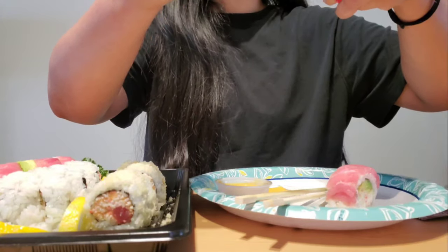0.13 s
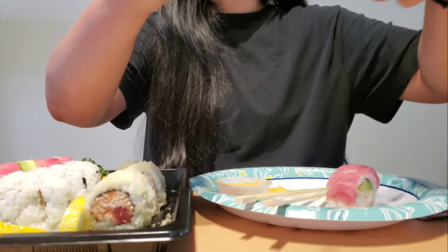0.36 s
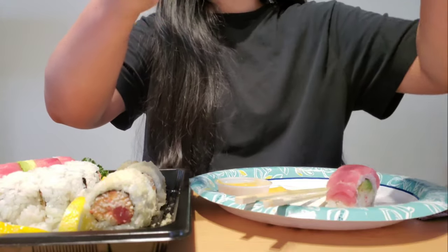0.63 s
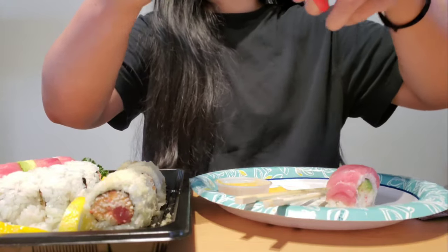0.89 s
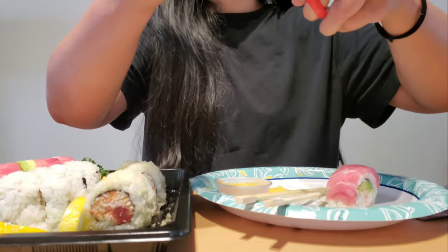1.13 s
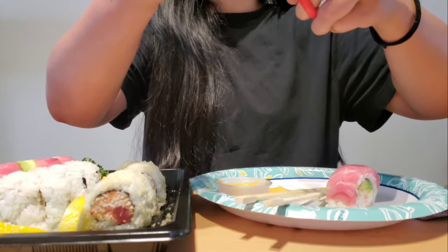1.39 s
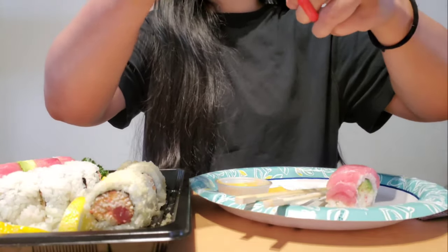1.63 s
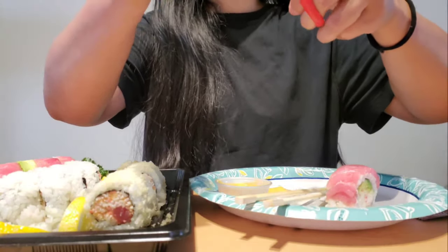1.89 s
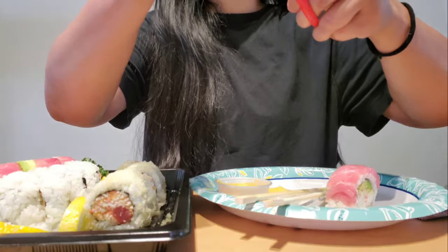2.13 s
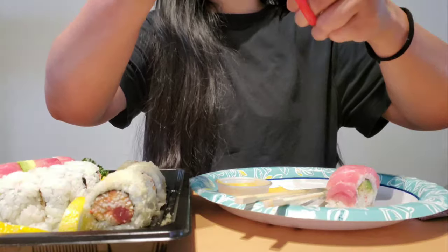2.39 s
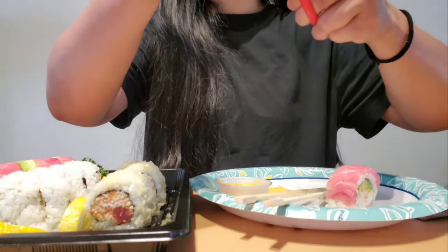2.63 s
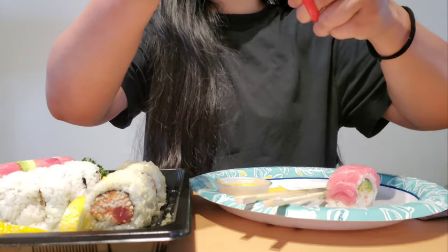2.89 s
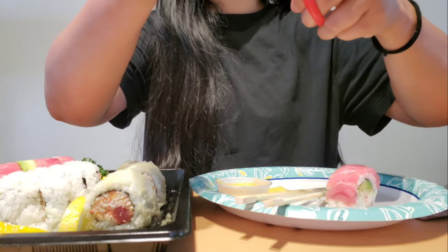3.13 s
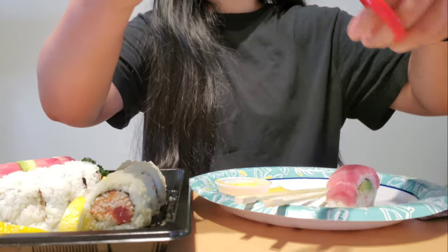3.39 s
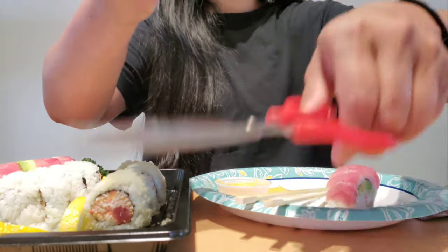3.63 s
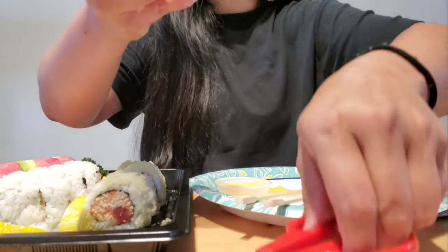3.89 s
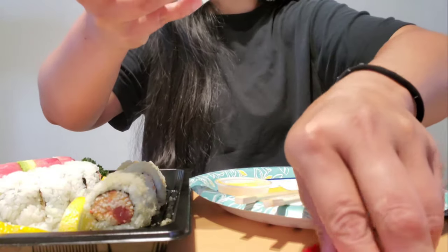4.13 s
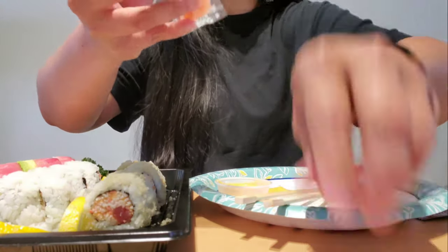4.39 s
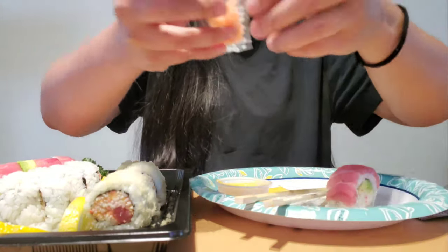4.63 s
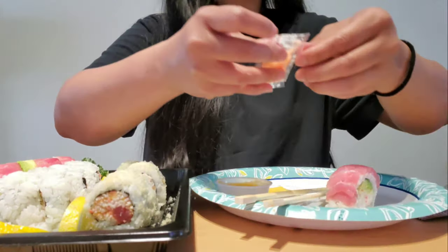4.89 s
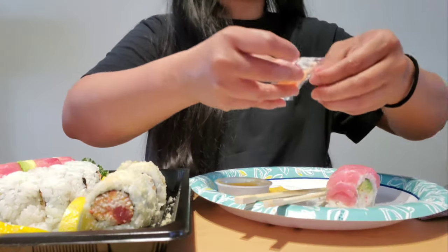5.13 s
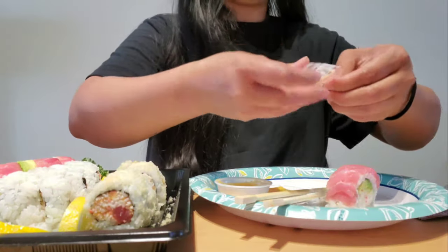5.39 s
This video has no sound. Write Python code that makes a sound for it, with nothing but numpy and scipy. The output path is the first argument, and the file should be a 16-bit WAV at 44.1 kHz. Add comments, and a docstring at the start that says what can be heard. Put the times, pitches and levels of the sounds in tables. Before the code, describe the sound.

Someone at a table handles a small film packet: sparse dry clicks, then crisp crackling bursts. After a short lull, scissors are set down left of centre, two firm knocks with a short metallic tick, then a quick rattling clack as the handles fall. Soft ventilation continues under very faint rustling.

```python
"""Sachet and scissors at a table

A small plastic sachet is turned in the fingers and cut: random ticks rustle, noise bursts snap, faint whistles squeak.
The scissors are then laid on the table top, bounce, and drop flat with a clatter, built from decaying modes and cracks.
Air handling rumbles softly behind as shaped noise; a short diffuse tail puts film and scissors in a quiet room."""
import sys
import numpy as np
from scipy import signal
from scipy.io import wavfile

SR = 44100
rng = np.random.default_rng(int(sys.argv[2]) if len(sys.argv) > 2 else 0)


def magnitude_from_level(level_db):
    """Linear magnitude for a level in decibels (20 dB per decade)."""
    exponent = np.asarray(level_db, float) / 20
    return 10 ** exponent


def store_wav(level_fs):
    """Save 16-bit WAV to argv[1]."""
    pcm = np.round(np.clip(np.atleast_2d(level_fs), -1, 1) * 32767)
    wavfile.write(sys.argv[1], SR, pcm.T.astype(np.int16))


N = 242991

# spectrum of the air handling: f/Hz, relative level per Hz/dB
AIR_SPECTRUM = [(15, -38), (25, -16.5), (53, -2.5), (80, -4.5), (208, -5), (238, -10), (378, -8), (422, -8),
                (617, -11.5), (1250, -16.5), (2400, -48), (4130, -39.5), (6730, -64.5), (15200, -40),
                (16500, -56)]
# left-right likeness of the air: f/Hz, correlation (1 same, 0 unrelated, -1 opposed)
AIR_LIKENESS = [(60, 0.88), (180, 0.99), (550, 0.48), (1650, -0.57), (4970, 0.85), (15000, -0.04)]
# fingers working the film: t/s, large creases level/dB, tight creases level/dB
RUSTLE_MOVES = [(0.0, -58, -64), (0.4, -64.5, -55.5), (0.74, -77, -67), (1.04, -77, -81), (1.5, -57, -70),
                (1.8, -61, -56), (1.9, -45.5, -44), (2.1, -57.5, -69), (2.36, -54, -48), (2.52, -53, -42),
                (2.6, -74, -82), (2.789, -53.5, -44), (2.91, -44, -44), (2.97, -57.5, -51),
                (3.13, -41, -49), (3.26, -68, -56), (3.42, -70, -74), (3.75, -57, -53), (3.88, -71, -61),
                (4.21, -44, -51.5), (4.8, -70, -70)]
# tone of the rustling film: f/Hz, relative level per Hz/dB
FILM_TONE = [(900, -17.5), (2000, -4.5), (3000, 7.5), (4500, 2.5), (7000, 1.5), (10000, -1), (13000, -5),
             (15500, -4.5)]
# faint squeaks, perhaps skin slipping on the film: t/s, length/s, f/Hz, level/dB
FILM_SQUEAKS = [(0.055, 0.15, 1850, -67.5), (0.339, 0.037, 1390, -58), (0.883, 0.09, 4270, -74),
                (5.17, 0.1, 4080, -73)]
# the clearest creases snapping: t/s, level/dB, panel ring f/Hz, dull part level/dB, bright part level/dB
# (both parts relative to the middle register)
CREASE_SNAPS = [(0.0949, -42, 3300, -3, -11), (0.1753, -46.5, 15500, -6, -3.5),
                (0.261, -50.5, 3100, 0, -10), (0.355, -49, 14860, -3, -10), (0.384, -45, 4400, -10, -4.5),
                (0.3976, -36.5, 3270, -1, -10), (0.4602, -48.5, 3580, -11, -0.5),
                (0.6754, -40, 15000, -5, 11.5), (1.296, -47.5, 3960, 4, -7.5), (1.437, -48, 4060, 1, -6),
                (1.4505, -35.5, 3160, 5.5, -10.5), (1.641, -32, 6260, -10.5, -4),
                (1.699, -31, 3340, -6, -6.5), (1.849, -21, 4620, -10, -5), (1.908, -37, 2870, 6.5, -5),
                (2.167, -30.5, 4040, -12, -13), (2.1801, -18.5, 4600, -12.5, -4.5),
                (2.19, -29, 4200, -20, -24), (2.2884, -24.5, 2950, -3.5, -6.5),
                (2.379, -25.5, 3140, 1.5, -10), (2.3855, -27.5, 3460, -12, -16), (2.4018, -41, 2700, -2, 2),
                (2.419, -44, 15400, -5, 2), (2.4373, -45, 13000, -1, 2), (2.4603, -30.5, 13500, 0.5, -8),
                (2.4797, -25.5, 6500, -7.5, 0.5), (2.744, -29, 3600, -1.5, 0.5),
                (2.829, -26.5, 6760, -4, -4), (2.874, -30, 4530, -5.5, -1.5), (2.94, -45, 14000, 8, 2),
                (2.9637, -42.5, 13900, 4, 1), (2.9956, -44, 15300, -2, 4), (3.035, -30, 16100, -3.5, 1.5),
                (3.0842, -29, 9850, -0.5, -9), (3.141, -26.5, 4180, 4, 3.5),
                (3.1455, -30.5, 15100, -4, 2.5), (3.2269, -22, 4600, -4, -7), (3.2299, -24.5, 5700, 0.5, 0),
                (3.2408, -25.5, 15400, -5, 4), (3.255, -32.5, 15000, 1, 4.5),
                (3.2707, -29.5, 2490, -8, -16), (3.3156, -37, 2730, 5, -4.5),
                (3.3223, -26, 2800, -3.5, -4.5), (3.3326, -25, 2940, -3, -13.5),
                (3.3828, -38, 14500, 0, 2.5), (3.766, -30, 3650, -6, -3), (4.7308, -44.5, 2630, -7, -8.5),
                (4.9513, -47.5, 4420, 5, -5.5)]
# scissor tips touch and bounce: t/s, table thud level/dB, tip knock level/dB, blade ring level/dB, crack level/dB
TIP_TOUCHES = [(3.933, -57.5, -51, -65, -39), (3.9765, -19, -11.5, -16, -18),
               (4.023, -23, -15.5, -23.5, -19), (4.047, -27.5, -28.5, -43.5, -33.5),
               (4.344, -36, -26.5, -45.5, -32.5), (4.362, -36.5, -32, -65.5, -43)]
# handles drop flat: t/s, table thud level/dB, handle clack level/dB, blade ring level/dB, crack level/dB
HANDLE_DROPS = [(4.367, -19, -17.5, -37, -9.5), (4.398, -22.5, -10, -58, -37.5),
                (4.411, -24, -21, -37.5, -8), (4.419, -34.5, -19.5, -57, -29),
                (4.429, -27, -32.5, -55.5, -33)]
# modes of the table top, its thud: f/Hz, level/dB, t60/s
THUD_MODES = [(92, -3, 0.18), (114, 0, 0.13), (148.2, -8.5, 0.4), (198.4, -7, 0.23), (294, -8.5, 0.12),
              (395.3, -11, 0.2)]
# modes of the table top as the tips knock it: f/Hz, level/dB, t60/s
KNOCK_MODES = [(460, -7, 0.043), (552, 0, 0.036), (590, -10.5, .04), (824, -13, 0.012)]
# modes of the scissor handles: f/Hz, level/dB, t60/s
HANDLE_MODES = [(507, -1.5, .03), (656, 0, 0.027), (734, 0.5, .02), (836, 0.5, 0.019), (1158, -2.5, 0.025),
                (1324, -7, 0.011), (1640, -2.5, .025), (1850, -6, 0.03), (2160, -10, 0.023),
                (2446, -10.5, 0.031), (2830, -11, 0.032)]
# modes of the scissor blades: f/Hz, level/dB, t60/s
BLADE_MODES = [(1890, -10.5, 0.038), (2183, -5, 0.02), (3414, -12, 0.022), (4400, -11, 0.04),
               (4520, -2, 0.019), (5050, -4, .015), (7200, -14.5, .02), (9100, -31.5, .015),
               (11420, -2.5, 0.0088), (13000, -5, 0.0046), (15100, -9.5, .005)]
# diffuse tail of the room: f/Hz, t60/s, level/dB
ROOM_TAIL = [(88.6, 0.43, -18), (250, 0.5, -8.5), (700, 0.54, -8), (1970, 0.57, -9.5), (5000, 0.37, -10),
             (9000, 0.34, -12), (15000, 0.12, -6)]

AIR_DB = -54
SACHET_LEFT_DB, FACING_SCATTER_DB = 2, 4   # held a little left; each crease faces its own way
SQUEAK_HALF_WIDTH_HZ = 120
CREASE_RISE_S, PANEL_RING_DB = 0.00035, -5
WALL_ECHO_S, WALL_ECHO_DB = 0.008, 10   # level is relative to the tail around it
# samples by which the right microphone hears later (negative: sooner)
FILM_LAG, SCISSORS_LAG = 4, -17
CUTOFF_HZ = 16700


def rms_one(x):
    """Level a signal to an rms of 1."""
    return x / np.sqrt(np.mean(x ** 2) + 1e-20)


def at_hz(points, hz, column=1):
    """Read a table column at a frequency, along a logarithmic pitch axis."""
    points = np.array(points)
    return np.interp(np.log(hz), np.log(points[:, 0]), points[:, column])


def band(x, low_hz, high_hz):
    """Band-pass between two frequencies."""
    edges = [low_hz, min(high_hz, .45 * SR)]
    return signal.sosfilt(signal.butter(2, edges, "band", fs=SR, output="sos"), x + 1e-18)


def drift(rate_hz):
    """Slow random wander with an rms of 1, made at every 40th sample and joined by lines."""
    pole = np.exp(-80 * np.pi * rate_hz / SR)
    white = rng.standard_normal(N // 40 + 2002)
    slow = signal.lfilter([1], [1, -2 * pole, pole * pole], white)[2000:]   # skip the settling
    return np.interp(np.arange(N) / 40, np.arange(len(slow)), rms_one(slow))


def burst(sound, t60):
    """Let a sound die away by 60 dB in t60 seconds."""
    return sound * magnitude_from_level(-60 * np.arange(len(sound.T)) / (t60 * SR))


def add(out, s, sound, left_db):
    """Lay a short two-channel sound in at its time, its left side raised over its right by left_db."""
    i = round(s * SR)
    sound = sound[:, :N - i]
    out[:, i:i + len(sound.T)] += sound * magnitude_from_level(np.array([[left_db / 2], [-left_db / 2]]))


def air():
    """Air handling: half-octave noise bands waver gently, each with its own likeness of left and right."""
    out, edges = 0, 22 * 2 ** np.arange(0, 10, .5)
    white = rng.standard_normal((2, 2, N))   # neighbouring bands get unrelated noise
    for k, (low, high) in enumerate(zip(edges, edges[1:])):
        mid, side = band(white[k % 2], low, high)
        hz = np.sqrt(low * high)
        alike = np.clip(at_hz(AIR_LIKENESS, hz), -1, 1)
        gain = magnitude_from_level(at_hz(AIR_SPECTRUM, hz) + 1.6 * drift(5.1))
        stereo = np.sqrt(1 + alike) * mid + np.sqrt(1 - alike) * side * [[1], [-1]]
        out = out + gain * stereo
    return magnitude_from_level(AIR_DB) * rms_one(out) * magnitude_from_level(np.array([[.6], [-.6]]))


def rustle():
    """Many tiny creases tick at random in clumps; each rings a few cycles at a pitch of its own."""
    s, large_db, tight_db = np.transpose(RUSTLE_MOVES)
    time = np.arange(N) / SR
    large_db, tight_db = np.interp(time, s, large_db), np.interp(time, s, tight_db)
    sizes = magnitude_from_level(3.9 * np.minimum(rng.exponential(size=(2, N)), 5))
    sizes = sizes * rng.choice([-1, 1], size=(2, N))
    chance = rng.random(size=(2, N))
    ticks_per_s = 7000 * magnitude_from_level(5.5 * drift(14))   # the wander gathers ticks into clumps
    ticks = sizes * (chance < ticks_per_s / SR)
    pitches, dealt, out = np.geomspace(1000, 15500, 12), rng.integers(0, 12, N), 0
    for k, hz in enumerate(pitches):
        tight = np.clip(np.log2(hz / 5500), 0, 1)   # small tight creases sound high
        gain = magnitude_from_level(at_hz(FILM_TONE, hz) + (1 - tight) * large_db + tight * tight_db)
        out = out + gain * band(ticks * (dealt == k), hz / 1.16, hz * 1.16)
    return out * magnitude_from_level(np.array([[1.5], [-1.5]]))


def squeaks():
    """Narrow noisy whistles that swell and fade."""
    out = np.zeros((2, N))
    noise = rng.standard_normal(size=(len(FILM_SQUEAKS), 2, 8000))
    for (s, length, hz, db), white in zip(FILM_SQUEAKS, noise):
        shared = white[0] + .5 * white   # mostly the same noise on both sides
        tone = rms_one(band(shared, hz - SQUEAK_HALF_WIDTH_HZ, hz + SQUEAK_HALF_WIDTH_HZ))
        swell = np.sin(np.pi * np.clip(np.arange(8000) / (length * SR), 0, 1))
        add(out, s, magnitude_from_level(db) * swell * tone, SACHET_LEFT_DB)
    return out


def snaps():
    """A crease flips over: a few milliseconds of crackle in three registers, and a brief ring of the film panel."""
    out, t = np.zeros((2, N)), np.arange(600) / SR
    noise = rng.standard_normal(size=(len(CREASE_SNAPS), 4, 600))
    for (s, level_db, hz, dull_db, bright_db), (both, left, right, facing) in zip(CREASE_SNAPS, noise):
        # each microphone faces another side of the film
        crackle = burst(both + 0.83 * np.array([left, right]), 0.011)
        crackle = crackle * (1 - np.exp(-t / CREASE_RISE_S))
        middle = band(crackle, 2700, 7270)
        dull = magnitude_from_level(dull_db) * band(crackle, 460, 2100)
        bright = magnitude_from_level(bright_db) * band(crackle, max(6500, 0.76 * hz), 16500)
        panel = magnitude_from_level(PANEL_RING_DB) * burst(np.sin(2 * np.pi * hz * t), 0.0081)
        left_db = SACHET_LEFT_DB + FACING_SCATTER_DB * facing[0]
        add(out, s, magnitude_from_level(level_db) * (middle + dull + bright + panel), left_db)
    return out


def ring(modes, chance, soft_s):
    """One contact sets off all modes; where it lands shifts strength, pitch and phase at each microphone."""
    t, waves = np.arange(round(.4 * SR)) / SR, 0
    for (hz, db, t60), (strength, pitch, left, right) in zip(modes, chance):
        offset = .5 * np.array([[left], [right]]) * np.log2(hz / 60)
        phase = 2 * np.pi * hz * (1 + .012 * pitch) * t + offset
        waves = waves + magnitude_from_level(db + 1.3 * strength - 60 * t / t60) * np.sin(phase)
    return waves * (1 - np.exp(-t / soft_s))   # a longer contact lets them swell in


def contacts(rows, body, scatter, soft_s, left_db):
    """Each contact thumps the table, sets off the body that it meets, rings the blades and cracks."""
    out = np.zeros((2, N))
    chance = rng.standard_normal(size=(len(rows), 3, 12, 4))
    noise = rng.standard_normal(size=(len(rows), 2, 1500))
    for (s, thud_db, body_db, blade_db, crack_db), (a, b, c), white in zip(rows, chance, noise):
        add(out, s, magnitude_from_level(thud_db) * ring(THUD_MODES, a * 0.2, 0.0018), 2.5)
        add(out, s, magnitude_from_level(body_db) * ring(body, b * scatter, soft_s), left_db)
        add(out, s, magnitude_from_level(blade_db) * ring(BLADE_MODES, c * 0.5, .0001), 12)
        crack = band(burst(white, 0.02), 1000, 6230)
        edge = magnitude_from_level(-9.0) * band(burst(white, .012), 3800, 16000)   # the sharp edge of the crack
        add(out, s, magnitude_from_level(crack_db) * (crack + edge), 9)
    return out


def scissors():
    """The tips knock the table top, then the handles clack down."""
    tips = contacts(TIP_TOUCHES, KNOCK_MODES, scatter=0.13, soft_s=.00033, left_db=5.5)
    handles = contacts(HANDLE_DROPS, HANDLE_MODES, scatter=0.65, soft_s=.00035, left_db=1.5)
    return band(tips + handles, 55, 18000)   # keep them free of rumble below the lowest table mode


def room(x):
    """A bunch of echoes from the wall behind, within a diffuse tail that dies band by band."""
    t = np.arange(round(.7 * SR)) / SR
    white, tail = rng.standard_normal(size=(2, 2, len(t))), 0   # neighbouring bands get unrelated noise
    for k, hz in enumerate(63 * 2. ** np.arange(9)):
        decay_db = -60 * t / at_hz(ROOM_TAIL, hz)
        gain = magnitude_from_level(at_hz(ROOM_TAIL, hz, column=2) + decay_db) / np.sqrt(SR * 0.021)
        tail = tail + gain * band(white[k % 2], hz / np.sqrt(2), hz * np.sqrt(2))
    tail = tail * np.clip((t - .003) / 0.0073, 0, 1)   # reflections thicken over the first milliseconds
    tail = tail * (1 + magnitude_from_level(WALL_ECHO_DB) * np.exp(-((t - WALL_ECHO_S) / 0.0023) ** 2))
    return signal.fftconvolve(x, tail, axes=1)[:, :N]


def later_right(x, lag):
    """The sound reaches the right microphone some samples apart from the left."""
    return np.array([x[0], np.roll(x[1], lag)])


def scene():
    """Film and scissors, heard directly and through the room, over the air handling."""
    film = snaps() + rustle() + squeaks()
    steel = scissors()
    wet = room(film + steel)
    direct = later_right(film, FILM_LAG) + later_right(steel, SCISSORS_LAG)
    return direct + wet + air()


def cut_top(x):
    """A steep low-pass takes off the extreme treble."""
    return signal.sosfilt(signal.cheby2(12, 50, CUTOFF_HZ, fs=SR, output="sos"), x)


def low_pass(x):
    """Removes everything above the highest recorded frequency."""
    return signal.sosfilt(signal.butter(12, 16970, fs=SR, output="sos"), x)


def record(dry):
    """Peaks are rounded softly and the extreme treble is cut."""
    rounded = np.tanh(dry)
    return low_pass(cut_top(rounded))


dry = scene()
out = record(dry)
store_wav(out)
```